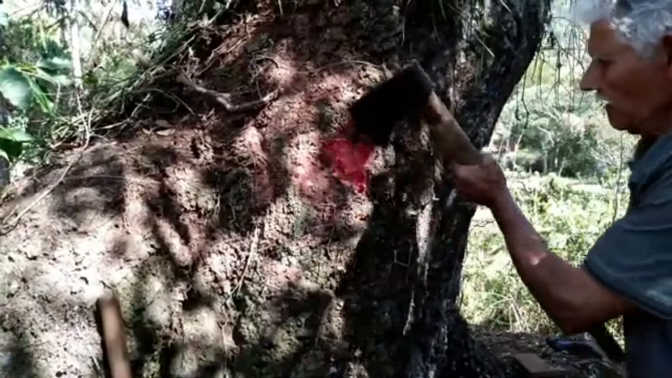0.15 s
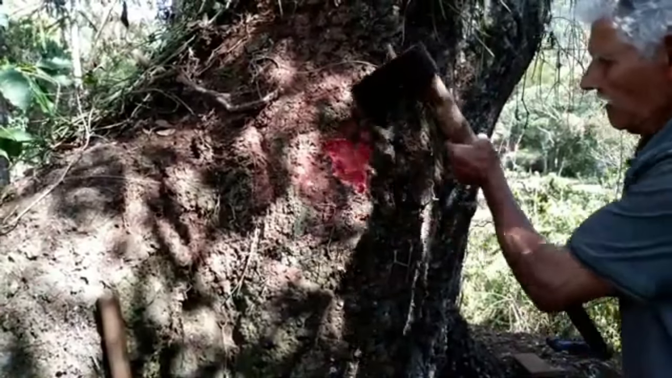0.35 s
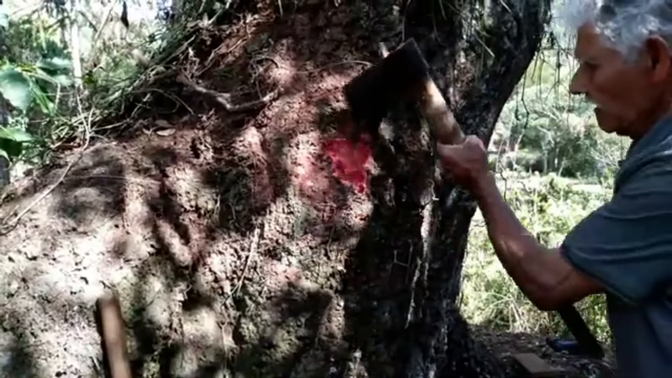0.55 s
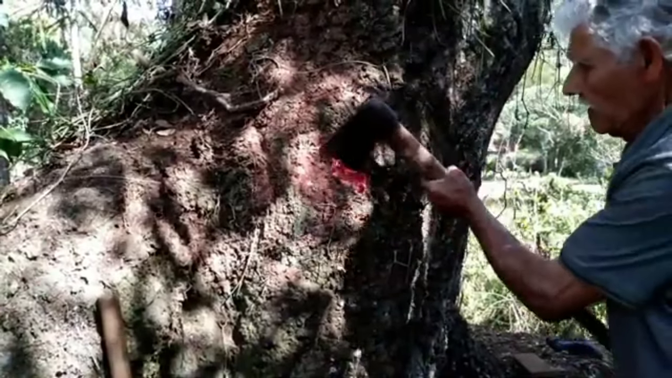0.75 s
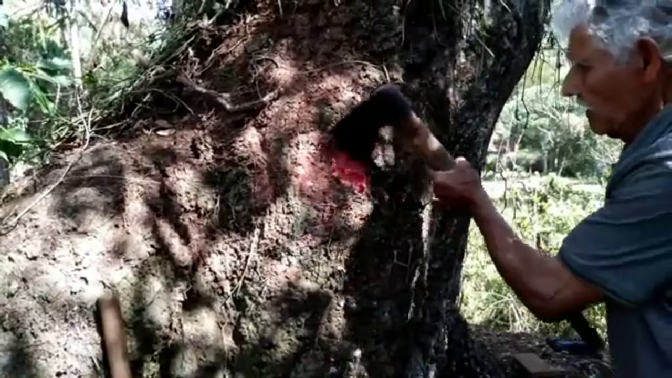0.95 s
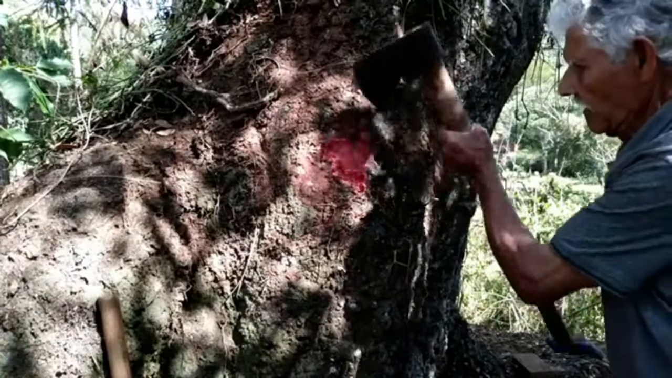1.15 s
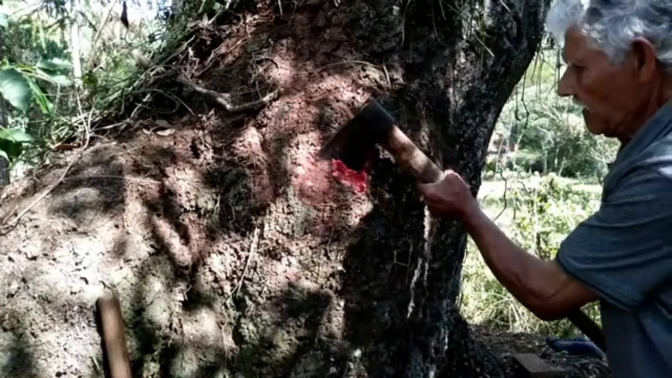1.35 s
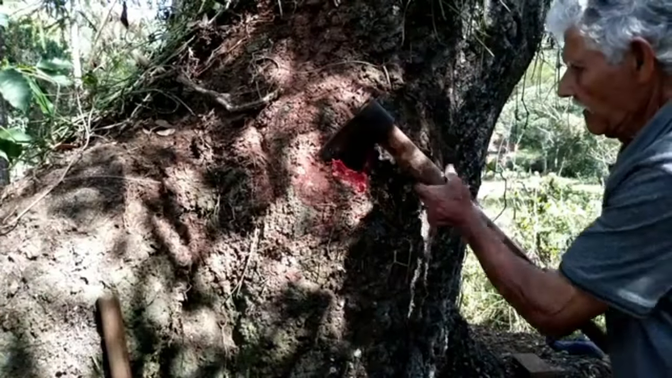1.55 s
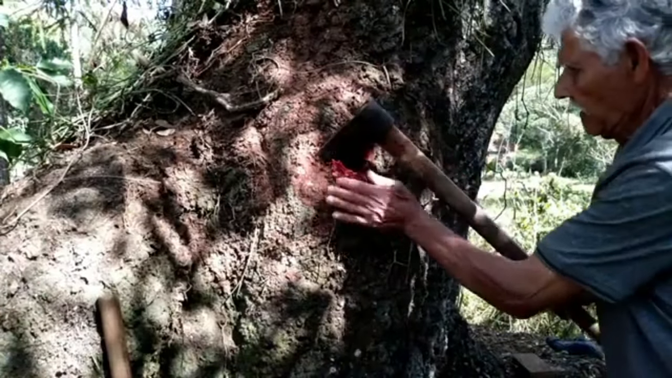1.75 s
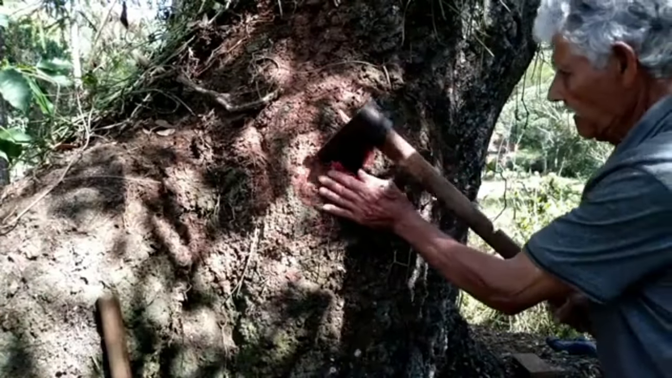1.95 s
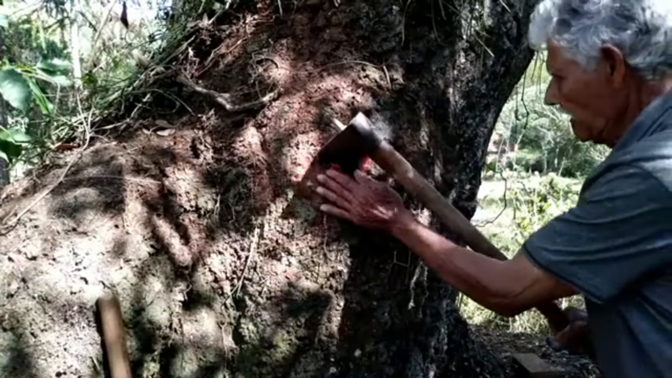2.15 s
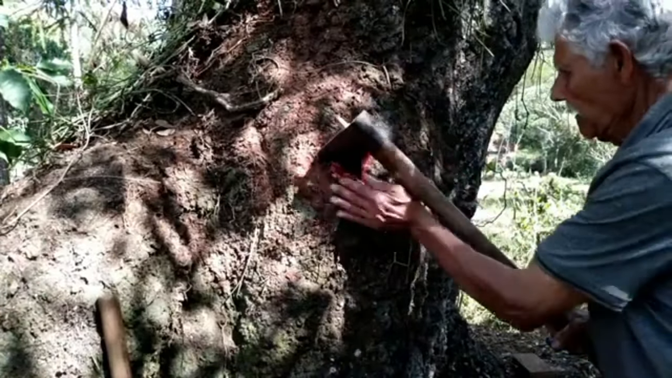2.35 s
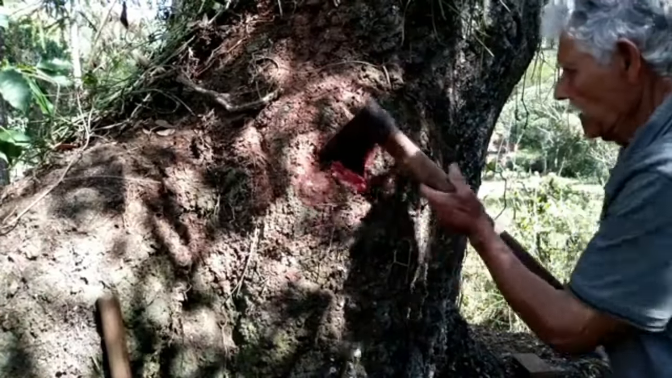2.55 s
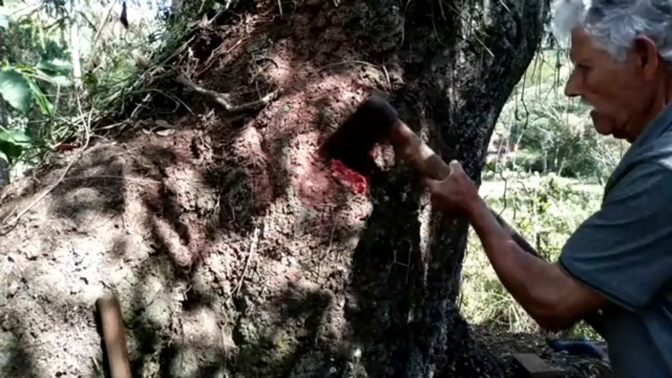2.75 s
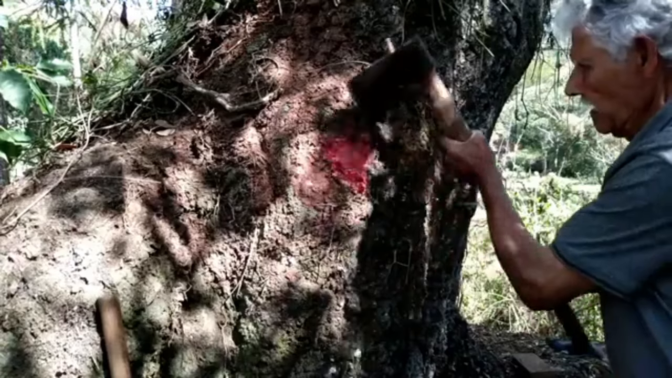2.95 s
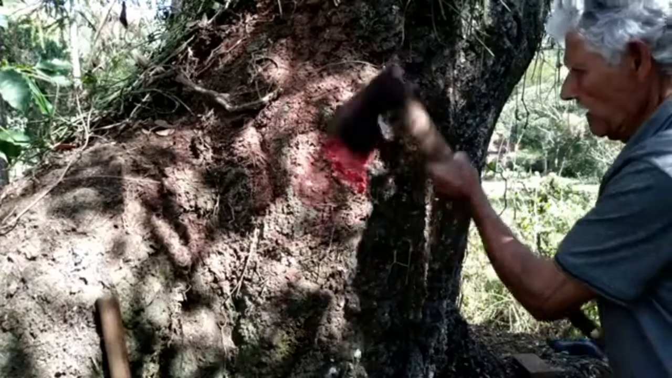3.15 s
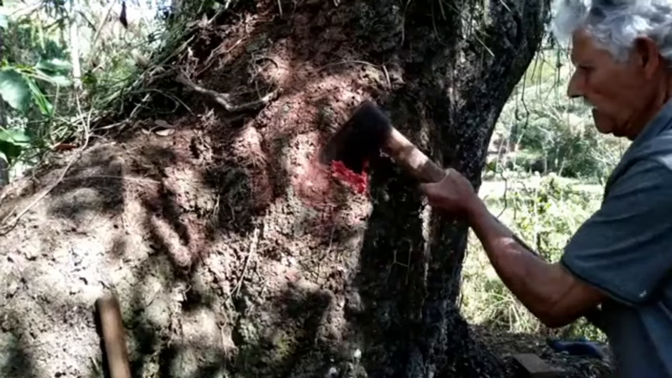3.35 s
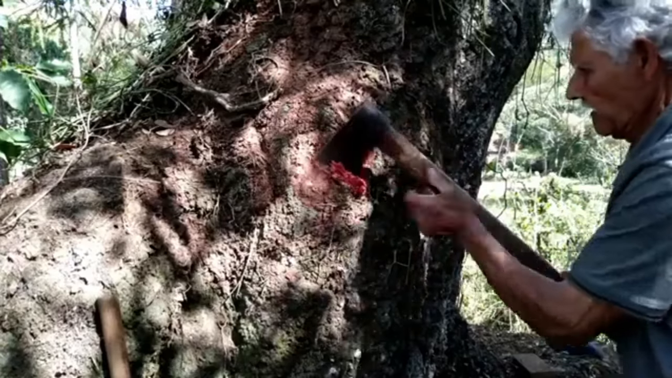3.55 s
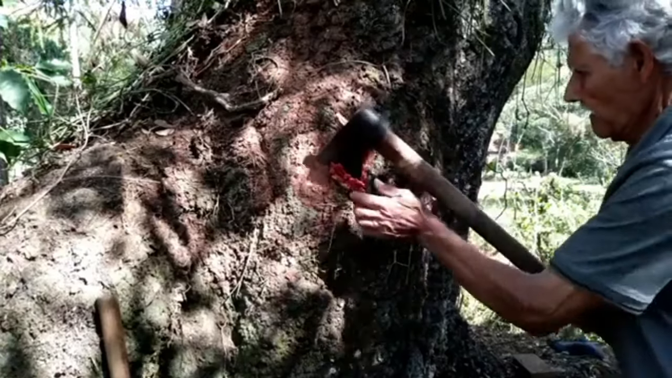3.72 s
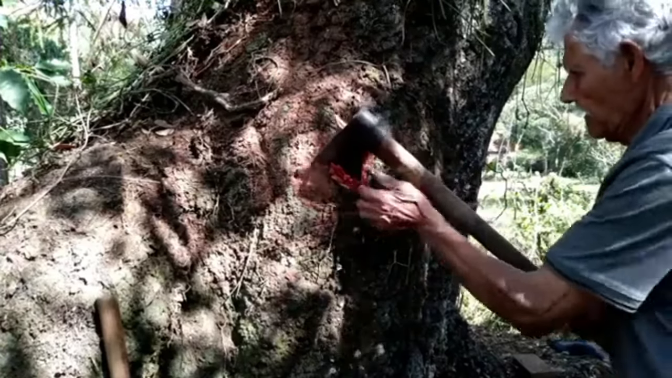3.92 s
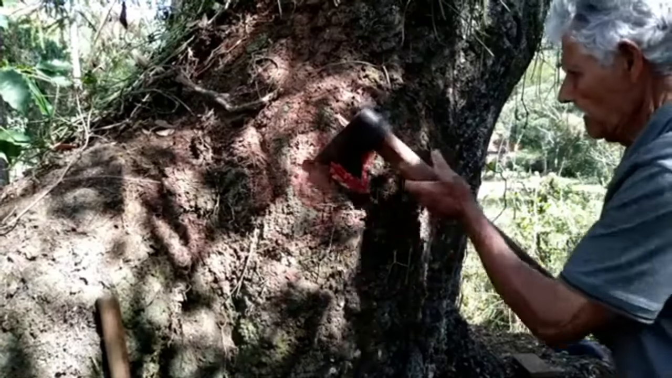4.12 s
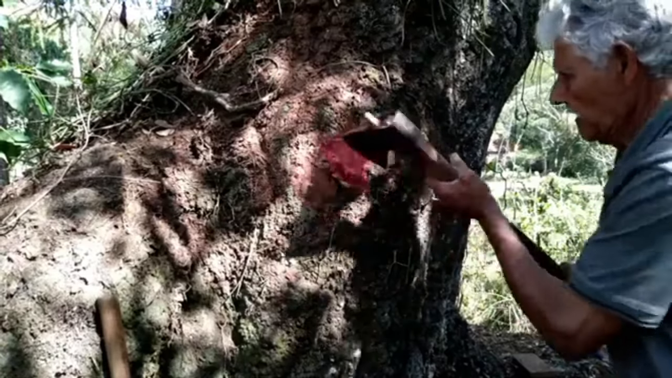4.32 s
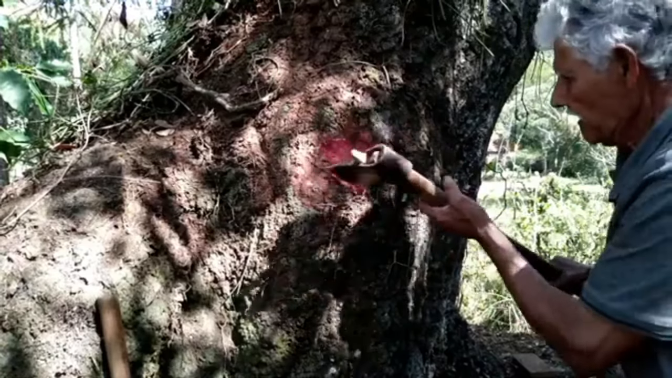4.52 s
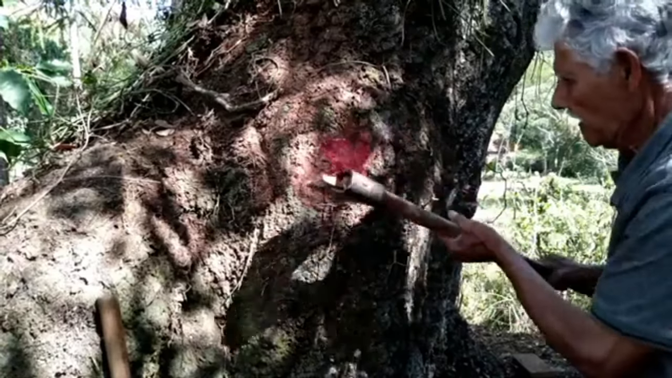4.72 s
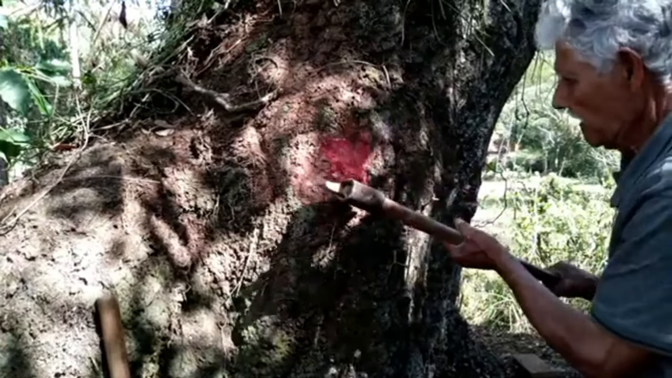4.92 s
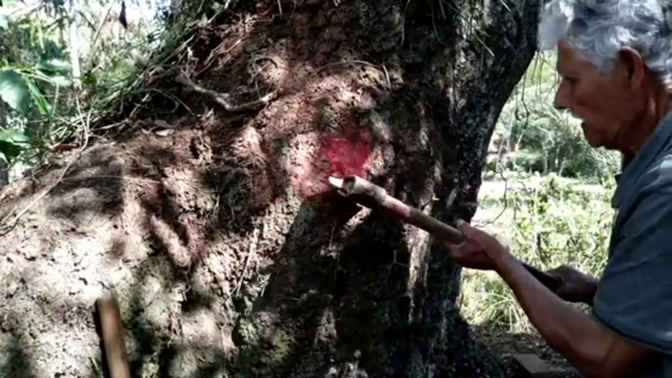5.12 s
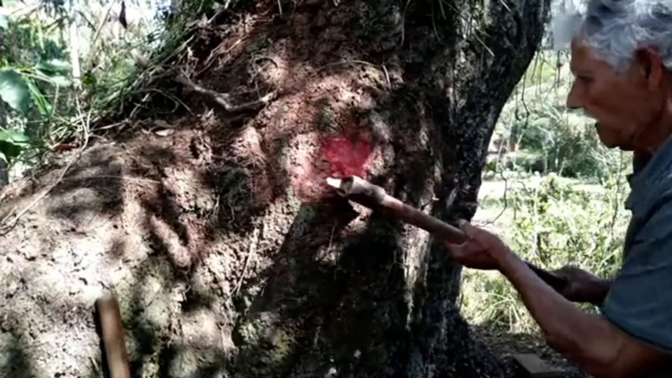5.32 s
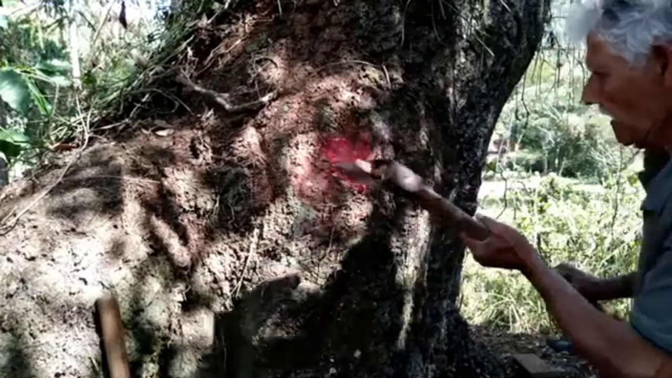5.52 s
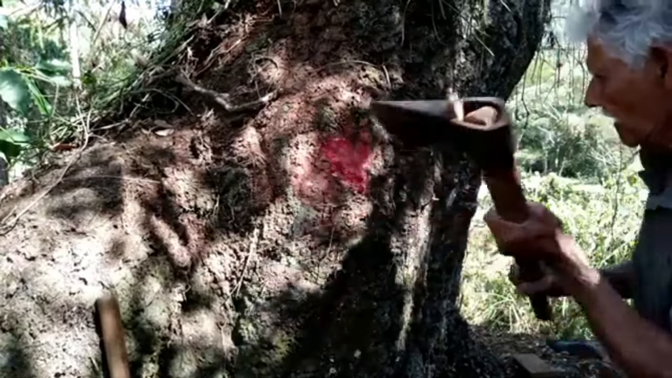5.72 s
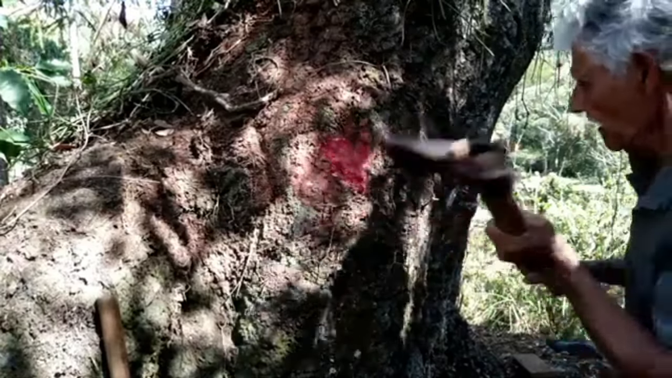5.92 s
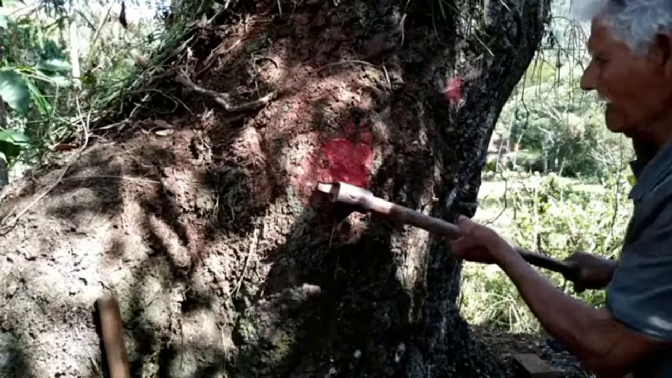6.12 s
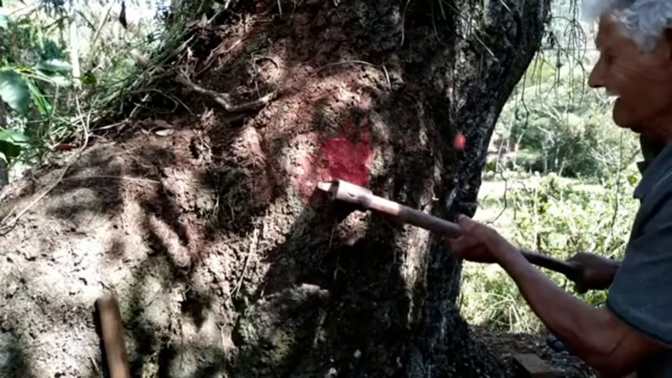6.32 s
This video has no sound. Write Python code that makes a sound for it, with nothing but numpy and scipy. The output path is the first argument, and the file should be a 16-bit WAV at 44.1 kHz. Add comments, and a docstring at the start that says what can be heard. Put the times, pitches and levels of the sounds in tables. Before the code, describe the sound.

Four short axe blows on a living trunk, the last two hardest, each a gritty bark crunch over a short woody thud with little echo. Between them come brittle fibre snaps, chip ticks and rasping scrapes. The nearby microphone takes soft low wind rumble; the treble sinks almost to silence between actions, leaving faint leaf rustle and thin insect tones.

```python
"""An axe bites four times into the thick bark of a standing trunk: noise crunches, struck modes thud.
Between blows blade and hand pry, scrape and crack the bark loose, as enveloped noise and chip rings.
Wind buffets a two-port microphone close by and insects sing far off, all as filtered noise.
A noise suppressor lowers the treble whenever nothing louder passes.
Source levels are set ahead of the port stage, which trims and colours them."""
import sys
import numpy as np
from scipy import signal
from scipy.io import wavfile
from scipy.ndimage import uniform_filter1d, minimum_filter1d

SR = 44100
rng = np.random.default_rng(int(sys.argv[2]) if len(sys.argv) > 2 else 0)


def bounce(signal):
    """Save signal as a 16-bit WAV file at the path given by the first command-line argument."""
    frames = np.transpose(np.atleast_2d(signal))
    limited = np.clip(frames, -1, 1)
    pcm = np.round(limited * 32767).astype(np.int16)
    wavfile.write(sys.argv[1], SR, pcm)


N = 281251

# Blade meeting wood, several contacts to a blow: (t/s, crunch peak level/dB, thud level/dB, crunch length/s)
BLADE_CONTACTS = [(0.637, -31.5, -54, 0.0068), (0.6429, -21.5, -48.5, 0.01), (0.652, -31, -52, 0.016),
                  (1.143, -47, -55.5, .002), (1.2809, -31, -32.5, 0.0084), (1.2873, -41.5, -30.5, 0.0041),
                  (1.2938, -13.5, -33, 0.0047), (1.2978, -41, -30, 0.006), (1.515, -59, -59, .015),
                  (1.526, -93, -53.5, 0.011), (3.178, -17.5, -38, 0.018), (3.1878, -11.5, -29.5, .0064),
                  (3.190, -24.5, -27, .0033), (6.0362, -11, -27, 0.0091), (6.041, -26, -20, .0023),
                  (6.046, -15, -23.5, 0.0025), (6.0497, -34, -25, .0053)]
# Modes of the trunk, the first five for the deep push: (f/Hz, relative level/dB, t60/s)
TRUNK_MODES = [(64.3, 1.5, 0.15), (136.5, -8.5, 0.22), (174, -2.5, 0.12), (208, -4.5, 0.16), (250, -4, .06),
               (284.2, -10, .06), (339, -7, .07), (380.8, -8.5, 0.073), (459.7, 4.5, 0.034),
               (537, 2, 0.024), (654, -4.5, 0.053), (704, -9, 0.04), (800, -20, .04), (936, -15.5, 0.05),
               (1028, -8, 0.021), (1150, -17, 0.027), (1385, -6, .03), (1580, -18.5, .02), (2000, -16, .02)]
# Tone of the crushed bark: (f/Hz, relative level/dB)
CRUNCH_TONE = [(500, -7.5), (1200, -8), (2500, 0), (5000, -3), (8000, 0), (11000, -13), (16000, -18.5)]
# Crumbs falling after each blow: (t/s, level/dB, t60/s)
CRUMB_FALLS = [(0.646, -35.5, 0.2), (1.146, -58, .09), (1.287, -30, .18), (3.186, -30.5, 0.23),
               (6.037, -26.5, 0.36)]
# Tone of the falling crumbs: (f/Hz, relative level/dB)
CRUMB_TONE = [(500, -11), (1200, -12.5), (2500, 2), (5000, -0.5), (8000, 0.5), (11000, -14), (16000, -21)]
# Shoves on the trunk: (t/s, force level/dB, length/s)
TRUNK_PUSHES = [(0.641, -75, 0.0015), (1.289, -63.5, 0.0018), (3.198, -64.5, 0.0019), (6.041, -53.5, 0.002),
                (6.051, -58, 0.00057)]
# Blurred tone of countless weak modes of bark and wood: (f/Hz, relative level/dB)
KNOCK_TONE = [(60, -13), (130, -2), (220, 7.5), (350, -6.5), (700, 4.5), (1200, -12), (1700, -10),
              (3000, -27)]
# Stopping time of the blade (s) at this crunch level (dB); it shortens as the bite hardens (dB per dB)
STOP_S, STOP_AT_DB, STOP_SLOPE = 0.00022, -24.5, 0.12
# Crunch peak over its mean; shares of the thud that ring the trunk modes and the weak modes (dB)
CREST_DB, SHOVE_DB, KNOCK_DB = 6, -14.5, -1


def blows():
    """The blade crushes bark, shoves the trunk into its modes and leaves crumbs falling."""
    crunch, debris, force, knock = np.zeros((4, 2, N))
    push, t = np.zeros(N), np.arange(SR // 3) / SR
    for s, crunch_db, thud_db, length in BLADE_CONTACTS:
        # flat while the edge travels, then it stops
        burst = np.minimum(t / 0.0041, 1) / (1 + (t / length) ** 6)
        add(crunch, s, amp(crunch_db - CREST_DB) * puff(burst, 0.42))
        # a quicker stop rings higher modes
        stop = STOP_S * amp(STOP_SLOPE * (STOP_AT_DB - crunch_db))
        shove = 0.00039 / stop * t / stop * np.exp(-t / stop)
        add(force, s, amp(thud_db + SHOVE_DB) * (shove + 0.12 * puff(burst, 0.93)))
        knock_shape = np.minimum(t / 0.0029, 1) * amp(-60 * t / 0.057)
        add(knock, s, amp(thud_db + KNOCK_DB) * puff(knock_shape, 0.47))
    for s, db, t60 in CRUMB_FALLS:
        fall = amp(db - 60 * t / t60) * np.minimum(t / 0.007, 1)
        add(debris, s, fall * pair(len(t), 0.28))
    for s, db, length in TRUNK_PUSHES:
        half_sine = np.maximum(np.sin(np.pi * np.minimum(t / length, 1)), 0)
        add(push, s, amp(db) * half_sine)

    modes = ringing(TRUNK_MODES, t)
    thud = signal.oaconvolve(-force, modes[5:].sum(0)[None], axes=1)[:, :N]
    # the wood lies nearer the right port, so the left hears it later
    thud[0] = np.interp(np.arange(N) - 0.00012 * SR, np.arange(N), thud[0])
    deep = signal.oaconvolve(-push, modes[:5].sum(0))[None, :N]
    thud_echo = amp(-14) * scattered(thud, 0.18, 0.0085)
    deep_echo = amp(-11.5) * scattered(deep, 0.21, 0.0085)
    splinters = debris * np.sqrt(0.37 + 0.18 * grains(300, 1.3, 0.006) ** 2)
    noises = colour(crunch, CRUNCH_TONE) + colour(splinters, CRUMB_TONE) + colour(knock, KNOCK_TONE)
    return noises + thud + deep + thud_echo + deep_echo


# Snaps of bark fibre, loudest or alone, and a few faint soft rustles that the suppressor lets through:
# (t/s, level/dB, chip f/Hz, t60/s)
SNAPS_AND_RUSTLES = [(0.027, -60, 2700, .015), (0.113, -63, 7100, 0.022), (0.89, -63.5, 5200, .06),
                     (1.1112, -58, 6630, 0.014), (1.1265, -57, 2000, .012), (1.1475, -48, 2200, 0.006),
                     (1.3945, -49.5, 4670, 0.022), (1.4147, -53, 3780, .026), (1.5293, -57, 4000, 0.023),
                     (1.7442, -56.5, 4780, 0.017), (1.7953, -52, 6900, .014), (1.8817, -39, 3280, 0.025),
                     (1.939, -45, 3460, 0.051), (1.952, -42, 2700, 0.028), (1.9922, -42, 2800, 0.042),
                     (2.0134, -45, 2630, 0.037), (2.0269, -32.5, 2942, 0.034), (2.064, -33, 3320, .02),
                     (2.0844, -42.5, 7000, 0.024), (2.1543, -45, 6330, .03), (2.1677, -43.5, 7300, .015),
                     (2.2032, -47.5, 7030, 0.015), (2.2198, -50.5, 3240, 0.032), (2.269, -55, 2000, 0.039),
                     (2.2963, -56, 3140, 0.061), (2.384, -57.5, 7400, 0.023), (3.3993, -53.5, 3740, 0.011),
                     (3.448, -43, 3070, 0.012), (3.4586, -48.5, 4650, .008), (3.479, -42, 5840, 0.017),
                     (3.497, -41.5, 4970, .01), (3.526, -41, 5500, 0.031), (3.5318, -37, 5170, .02),
                     (3.545, -55, 2560, 0.042), (3.5634, -55.5, 2510, .016), (3.5807, -54.5, 3700, 0.022),
                     (3.6146, -51.5, 7050, 0.014), (3.626, -46, 5440, .012), (3.6622, -45, 5000, 0.034),
                     (3.68, -32.5, 4560, 0.011), (3.6907, -39, 5840, 0.01), (3.739, -41, 5340, 0.043),
                     (3.7523, -43.5, 4600, 0.036), (3.8182, -50, 5830, 0.017), (3.862, -56.5, 7300, 0.035),
                     (3.8855, -56, 4000, .012), (3.895, -56, 4100, .012), (3.91, -47, 5650, 0.018),
                     (3.9263, -44.5, 4700, 0.032), (3.9933, -56, 3500, 0.034), (4.041, -55.5, 4340, 0.011),
                     (4.0645, -55, 5320, 0.01), (4.0865, -61, 3750, 0.068), (4.1242, -58, 4440, 0.045),
                     (4.163, -56.5, 2890, 0.029), (4.19, -54.5, 3470, 0.008), (4.4175, -56, 2820, 0.011),
                     (4.466, -59, 2600, 0.011), (5.022, -51.5, 2900, 0.018), (5.331, -56, 2700, 0.032),
                     (5.895, -66, 7300, .015), (6.1504, -36, 7100, .015)]
# Tone of rubbed and snapping bark, shared with the strokes: (f/Hz, relative level/dB)
SCRAPE_TONE = [(500, -55), (1300, -8), (2700, 1.5), (4000, 3), (6000, 4.5), (8500, 2), (11500, -7.5),
               (16000, -9)]
# Chip ring (dB) against a burst of this level (dB); louder snaps ring their chip less (dB per dB)
CHIP_DB, CHIP_AT_DB, CHIP_SLOPE = -3.5, -50.5, 0.3
HARD_DB = -47.5  # snaps above this start with a full hard edge, fainter bursts with a weaker one


def cracks():
    """A noise burst rings a few cycles of a chip: ticking for strong snaps, soft for faint rustles."""
    bursts, rings, t = np.zeros((2, N)), np.zeros((2, N)), np.arange(SR // 20) / SR
    for s, db, hz, t60 in SNAPS_AND_RUSTLES:
        edge = 3.3 * min(amp(db - HARD_DB), 1) * amp(-60 * t / 0.0025)
        body = np.minimum(t / 0.0023, 1) * amp(-60 * t / t60)
        burst = amp(db) * puff(body + edge, 0.64)
        add(bursts, s, burst)
        chip = amp(-60 * t[:300] / 0.004) * np.sin(2 * np.pi * hz * t[:300])
        chip_ring = signal.oaconvolve(burst, chip[None] / np.linalg.norm(chip), axes=1)
        add(rings, s, amp(CHIP_DB + CHIP_SLOPE * (CHIP_AT_DB - db)) * chip_ring)
    return colour(bursts, SCRAPE_TONE) + rings


# Strokes over the bark: (t/s, rise/s, hold/s, fall/s, level/dB, grit 0-1,
# treble over bass level/dB, hollow ring level/dB)
BARK_STROKES = [(0.125, 0.057, .025, 0.01, -59.5, 0.24, -2, -15),
                (1.377, 0.042, 0.0028, 0.0094, -63.5, 0.6, -13, 10),
                (1.497, 0.037, .025, 0.028, -67, 0.44, 2.5, 7.5),
                (1.686, 0.013, 0.0046, 0.11, -65, 0.52, 7, -19),
                (1.766, 0.035, 0.0054, 0.046, -49.5, 0.77, 2, -27),
                (1.801, 0.18, 0.074, .07, -48.5, 0.66, 6, 8.5), (2.077, 0.058, .03, 0.023, -50, 0.5, 4, 1),
                (2.176, 0.016, 0.011, 0.1, -57.5, 0.6, 3, -3),
                (3.429, 0.022, 0.092, 0.06, -59, 0.4, -5.5, -4),
                (3.589, 0.091, 0.076, 0.061, -47, 0.69, 5.5, -20),
                (3.807, 0.024, 0.0062, 0.081, -62, .7, 6, -11),
                (3.872, 0.053, 0.0037, 0.033, -48.5, 1, 0.5, -31),
                (4.228, 0.026, 0.0016, 0.026, -50.5, 0.4, -5.5, -32),
                (4.563, 0.075, 0.057, 0.03, -52, 0, -9.5, -23),
                (5.014, .005, 0.018, 0.008, -68, 0.6, 0, 18)]
EASE = 1.56  # exponent: how curved the rise and fall of a stroke are


def strokes():
    """Rubbing is a hiss; grit breaks it into clumps of tiny snaps of very unequal size."""
    t, out = np.arange(SR // 2) / SR, np.zeros((2, N))
    clumps, hiss = grains(450, 3.5, 0.003), pair(N, 0.23)
    for s, rise, hold, fall, db, grit, tilt_db, hollow_db in BARK_STROKES:
        ramps = np.minimum(t / rise, (rise + hold + fall - t) / fall)
        press = np.clip(ramps, 0, 1) ** EASE
        here = slice(round(s * SR), round(s * SR) + len(t))
        grit = np.clip(grit, 0, 1)
        texture = np.sqrt(1 - grit + grit * clumps[here] ** 2)
        rub = colour(amp(db) * press * texture * hiss[:, here], SCRAPE_TONE)
        low = signal.lfilter(*signal.butter(1, 4500, fs=SR), rub)
        high = rub - low
        # the air gap behind the loosened slab resounds
        gap = signal.lfilter(*signal.iirpeak(2850, 3.0, fs=SR), rub)
        add(out, s, amp(-tilt_db / 2) * low + amp(tilt_db / 2) * high + amp(hollow_db) * gap)
    return out


# Modes of the axe handle: (f/Hz, relative level/dB, t60/s)
HANDLE_MODES = [(930, -5.5, 0.06), (1400, -11, .02), (2060, -9.5, .025), (2426, -1.5, 0.038),
                (3170, -7, .025), (3580, 1.5, .03), (5500, -7.5, .015), (6960, -12, 0.0067)]
# The handle works in the axe head: (t/s, length/s, level/dB, brightness/dB per octave)
HANDLE_CREAKS = [(1.208, 0.04, -64, -3), (1.223, 0.02015, -63.5, 10.5)]


def creaks():
    """Brief friction rings the modes of the handle."""
    out, t = np.zeros((2, N)), np.arange(SR // 10) / SR
    octaves = np.log2(np.transpose(HANDLE_MODES)[0] / 2000)
    for s, length, db, tilt_db in HANDLE_CREAKS:
        count = round(length * SR)
        body = amp(tilt_db * octaves) @ ringing(HANDLE_MODES, t)
        rub = pair(count, 0.62) * signal.windows.tukey(count, 0.3)
        creak = signal.oaconvolve(rub, body[None] / np.linalg.norm(body), axes=1)
        add(out, s, amp(db) * creak)
    return out


# Course of the wind: (t/s, buffeting level/dB, roar level/dB)
WIND_COURSE = [(0.0, -48.5, -56.5), (0.25, -46, -68), (0.75, -46.5, -67), (1.05, -48.5, -64),
               (1.33, -40, -67.5), (1.7, -46, -67), (2.65, -46.5, -66), (3.0, -47.5, -59),
               (3.23, -47.5, -64.5), (4.069, -48, -67), (4.65, -47, -66.5), (5.01, -46.5, -57.5),
               (5.2, -47.5, -63), (5.7, -47.5, -67.5), (5.88, -46, -58), (5.96, -49.5, -61),
               (6.38, -46.5, -61.5)]
# Tone of the pressure on the ports: (f/Hz, relative level/dB)
BUFFET_TONE = [(5.9, -25), (10, 6.5), (18, 6), (33, -8.5), (59, -6), (96, -12.5), (226, -27.5),
               (300, -35.5), (390, -58), (660, -120)]
# Tone of the air through the trees: (f/Hz, relative level/dB)
ROAR_TONE = [(80, -13), (150, -7.5), (250, 1.5), (500, -2.5), (800, -11.5), (1200, -19.5), (2000, -41)]


def wind():
    """Lumpy low pressure noise on the ports, and a roar of air through the trees."""
    s, buffet_db, roar_db = np.transpose(WIND_COURSE)
    t = np.arange(N) / SR
    buffet_gain = amp(np.interp(t, s, buffet_db) + 1.5 * wander(0.05))
    roar_gain = amp(np.interp(t, s, roar_db) + 0.74 * wander(0.032))
    buffet = colour(pair(N, 0.41), BUFFET_TONE) * buffet_gain
    roar = colour(pair(N, 0.17), ROAR_TONE) * roar_gain
    return buffet + roar


# Tone of the leaves: (f/Hz, relative level/dB)
LEAF_TONE = [(700, -19.5), (1300, -5.5), (3000, 0.5), (7000, -2), (10000, -10.5), (16000, -6.5)]
# Course of the rustle: (t/s, level/dB)
RUSTLE_COURSE = [(0, -63.5), (.12, -65), (.3, -69.5), (0.9, -67), (2.65, -65.5), (2.9, -69.5), (4.0, -63),
                 (4.8, -69.5), (5.1, -66.5), (5.6, -71.5), (6.38, -65)]
# Faint far tones, perhaps insects above 4 kHz and birds below: (t/s, length/s, f/Hz, width/Hz, level/dB)
FAR_TONES = [(0.296, 0.36, 5720, 170, -75), (0.446, 0.18, 5230, 190, -79), (0.75, 0.33, 5400, 700, -76),
             (2.452, 0.35, 5780, 250, -75.5), (2.529, 0.24, 7260, 500, -77), (2.57, 0.17, 2580, 90, -77),
             (2.86, 0.2, 2175, 250, -78), (2.978, .17, 5190, 160, -77), (4.0, 0.5, 5480, 600, -77),
             (4.45, .55, 5750, 250, -79), (4.84, 0.22, 2140, 250, -77), (5.196, .3, 5750, 200, -79),
             (5.36, .3, 7200, 700, -78), (5.45, .7, 5400, 900, -75)]


def undergrowth():
    """Leaves rustle faintly as noise; far callers sing in narrow wavering bands of noise."""
    s, db = np.transpose(RUSTLE_COURSE)
    rustle_db = np.interp(np.arange(N) / SR, s, db) + 1.2 * wander(0.04)
    out = amp(rustle_db) * colour(pair(N, 0.087), LEAF_TONE)
    for s, length, hz, width, db in FAR_TONES:
        count = round(length * SR)
        band = signal.butter(2, [hz - width / 2, hz + width / 2], "band", fs=SR, output="sos")
        call = evened(signal.sosfilt(band, pair(count, 0.36)))
        waver = amp(2.1 * wander(0.015)[:count])
        add(out, s, amp(db) * call * signal.windows.tukey(count, 0.4) * waver)
    return out


def amp(db):
    """Decibels to gain."""
    return 10 ** (np.asarray(db) / 20)


def evened(x):
    """Scales to rms 1."""
    return x / np.sqrt(np.mean(x ** 2) + 1e-20)


def colour(x, points):
    """Filters causally (minimum phase) through a spectrum, keeping the power of white noise."""
    hz = abs(np.fft.fftfreq(8192, 1 / SR))
    f, db = np.transpose(points)
    log_gain = np.log(amp(np.interp(np.log(hz + 1), np.log(f + 1), db)))
    taps = np.fft.ifft(np.exp(np.conj(signal.hilbert(log_gain)))).real[:4096]
    return signal.oaconvolve(x, taps[None] / np.linalg.norm(taps), axes=1)[:, :x.shape[1]]


def pair(count, alike):
    """Noise at two ports that share part of it (alike = correlation 0-1)."""
    a, b = rng.standard_normal((count, 2)).T
    alike = np.clip(alike, 0, 1)
    return np.array([a, alike * a + np.sqrt(1 - alike ** 2) * b])


def wander(seconds):
    """Slow chance of rms 1: noise smoothed twice."""
    size = max(round(seconds * SR), 1)
    smooth = uniform_filter1d(rng.standard_normal(N), size)
    return evened(uniform_filter1d(smooth, size))


def puff(envelope, alike):
    """A short noise burst whose energy is that of its envelope."""
    burst = envelope * pair(len(envelope), alike)
    return burst * np.linalg.norm(envelope) / np.linalg.norm(burst, axis=1, keepdims=True)


def grains(per_s, spread_db, t60):
    """Envelope of rms 1 made of tiny snaps of unequal size."""
    sizes = amp(spread_db * np.minimum(rng.exponential(1, N), 3))
    snaps = sizes * (rng.random(N) < per_s / SR)
    decay = amp(-60 * np.arange(600) / SR / t60)
    return evened(signal.oaconvolve(snaps, decay)[:N])


def ringing(modes, t):
    """One dying sine for each mode; neighbours start in opposite directions."""
    return np.array([(-1) ** k * amp(db - 60 * t / t60) * np.sin(2 * np.pi * hz * t)
                     for k, (hz, db, t60) in enumerate(modes)])


def scattered(x, t60, delay_s):
    """Trunk, leaves and ground return a short diffuse tail."""
    t = np.arange(SR // 4) / SR
    tail = rng.standard_normal((len(t), 2)).T * amp(-60 * t / t60) * (t > delay_s)
    return signal.oaconvolve(x, tail / np.linalg.norm(tail[0]), axes=1)[:, :N]


def add(mix, s, sound):
    """Adds a sound into the mix at time s."""
    part = mix[..., round(s * SR):][..., :sound.shape[-1]]
    part += sound[..., :part.shape[-1]]


def scene():
    """Everything as it reaches the two ports."""
    bark = cracks() + strokes() + creaks()
    bark_echo = amp(-18) * scattered(bark, 0.051, 0.0016)
    return blows() + bark + bark_echo + wind() + undergrowth()


# Cavity resonance of each port: (f/Hz, relative level/dB)
LEFT_CAVITY = [(1500, 0.5), (5500, -1.5), (7300, 3), (8500, -5), (10500, -12.5), (16000, -11.5)]
RIGHT_CAVITY = [(1500, 1.5), (5500, -1), (7000, -13), (8800, -5), (10300, 5.5), (12500, -5), (16000, -13.5)]
HISS_DB, EDGE_HZ = -84.5, 15800  # circuit hiss level; upper band limit


def record(dry):
    """Port resonances, a suppressor that lowers the treble while it is quiet, circuit hiss, band limit."""
    ports = np.vstack([colour(dry[:1], LEFT_CAVITY), colour(dry[1:], RIGHT_CAVITY)]) * amp(-2.5)
    bass = signal.sosfiltfilt(signal.butter(2, 1100, fs=SR, output="sos"), ports)
    treble = ports - bass
    watched = signal.sosfiltfilt(signal.butter(2, 2000, "high", fs=SR, output="sos"), ports)
    power = uniform_filter1d((watched ** 2).mean(0), size=250)
    power_db = 10 * np.log10(abs(power) + 1e-12)
    # stays open a moment after a sound
    held_db = -minimum_filter1d(-power_db, size=450, origin=150)
    keep = np.exp(-1 / (0.12 * SR))
    recent_db = signal.lfilter([1 - keep], [1, -keep], np.maximum(power_db + 68.0, 0))
    # 0 open, 1 shut; after loud sounds it shuts sooner
    shut = 1 / (1 + np.exp(1.57 * (held_db + 65 - 0.37 * recent_db)))
    out = bass + treble * amp(-14 * uniform_filter1d(shut, size=100))
    out += amp(HISS_DB) * pair(N, 0.17)
    band_limit = signal.firwin(255, EDGE_HZ, window=("kaiser", 7), fs=SR)
    return signal.oaconvolve(out, band_limit[None], "same")


dry = scene()
out = record(dry)
bounce(out)
```